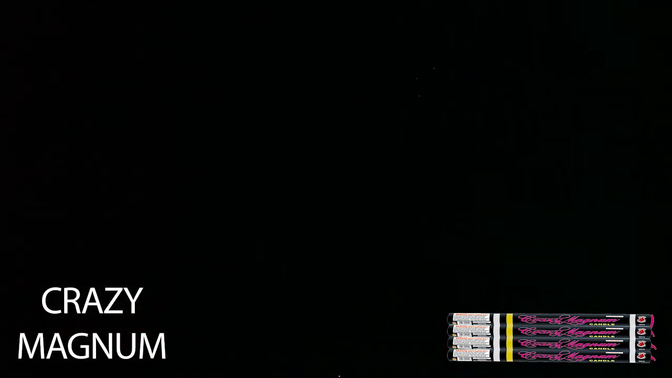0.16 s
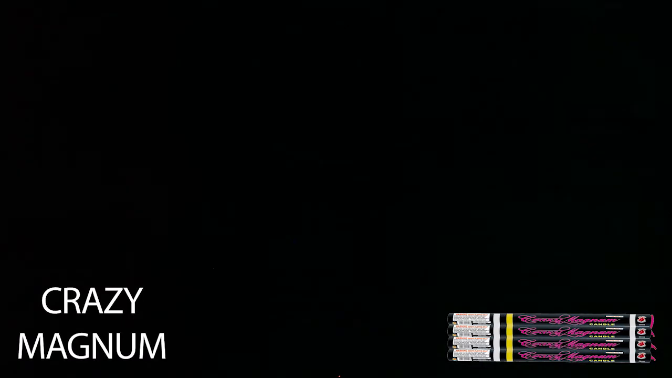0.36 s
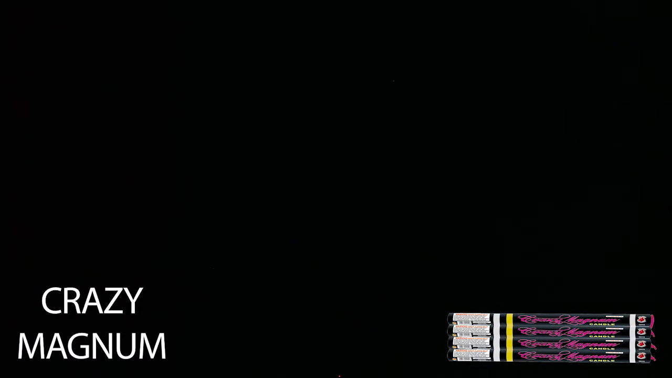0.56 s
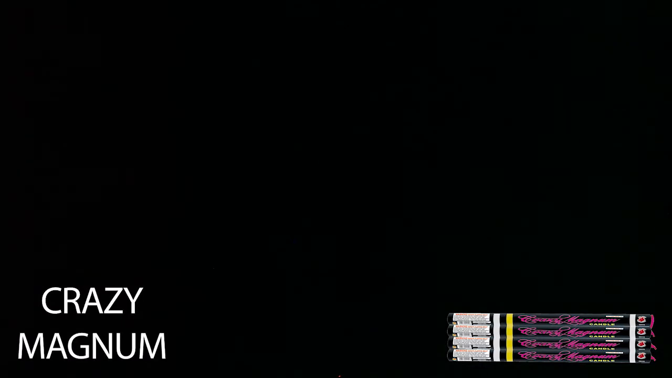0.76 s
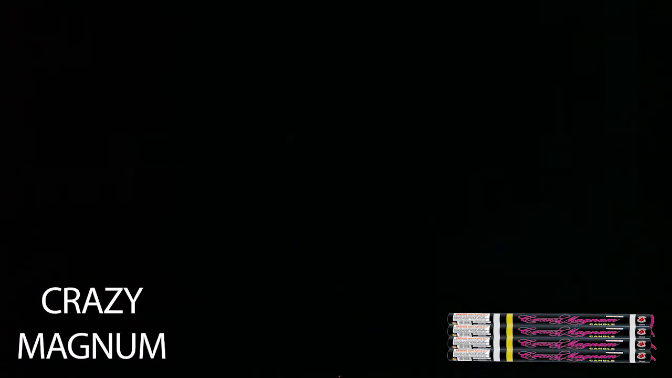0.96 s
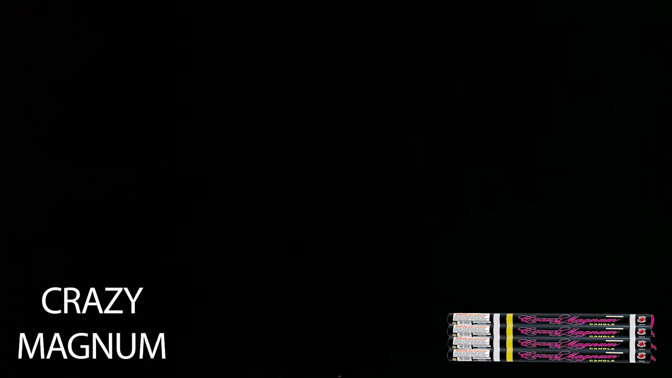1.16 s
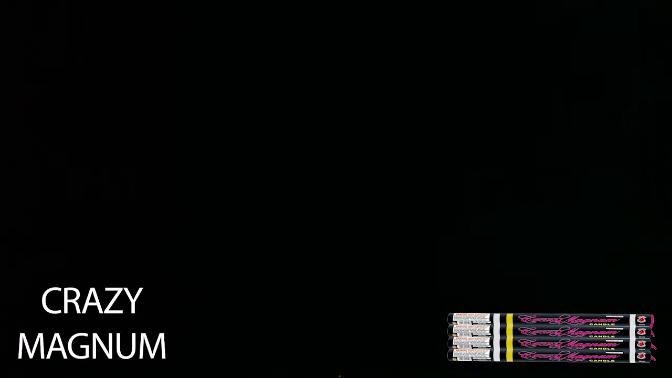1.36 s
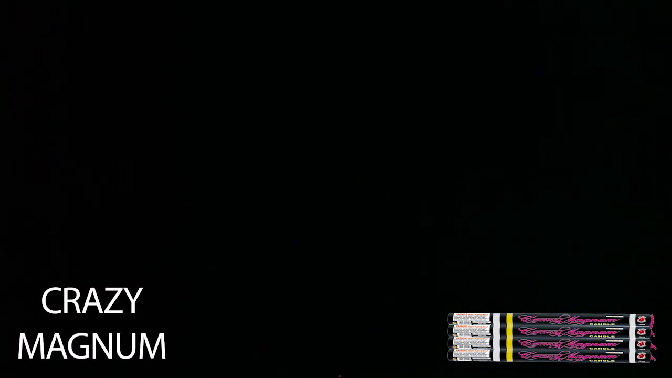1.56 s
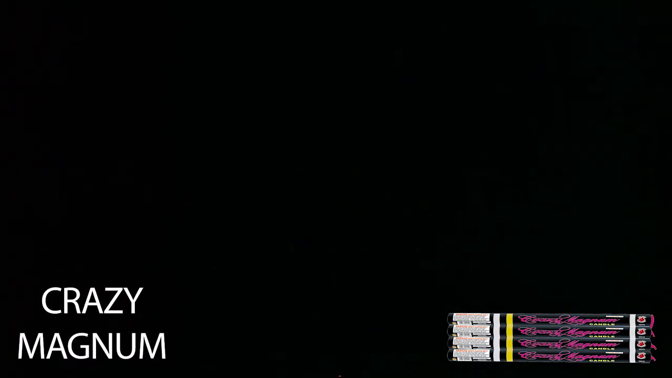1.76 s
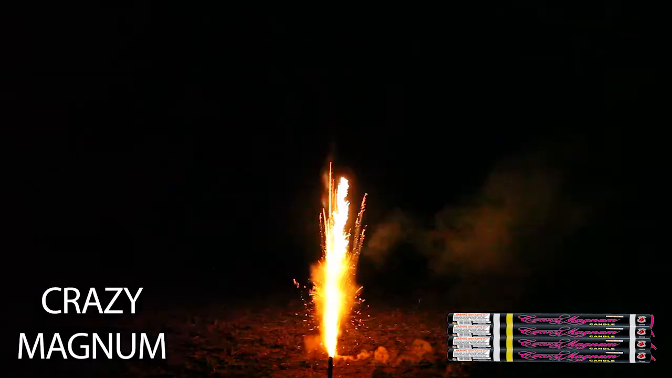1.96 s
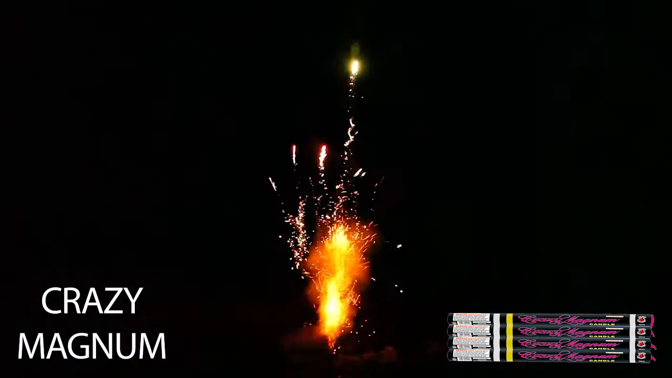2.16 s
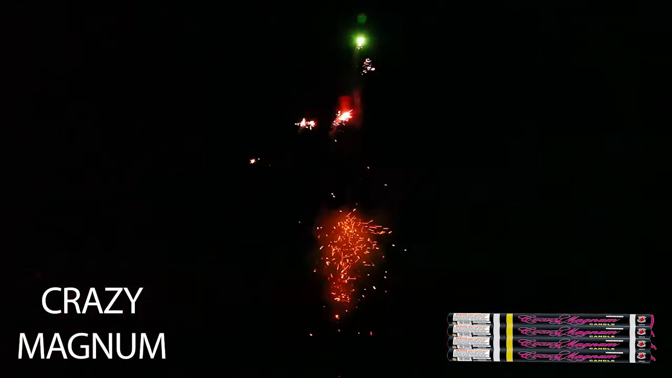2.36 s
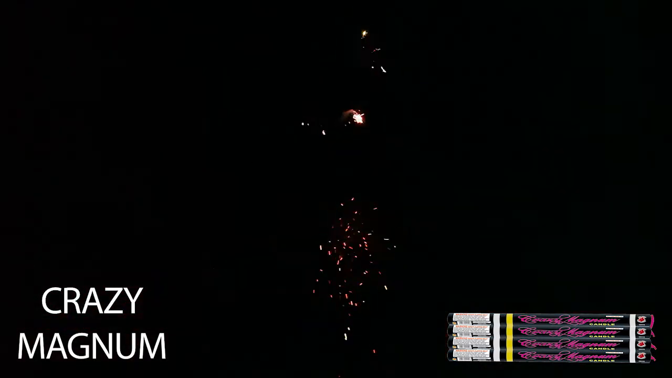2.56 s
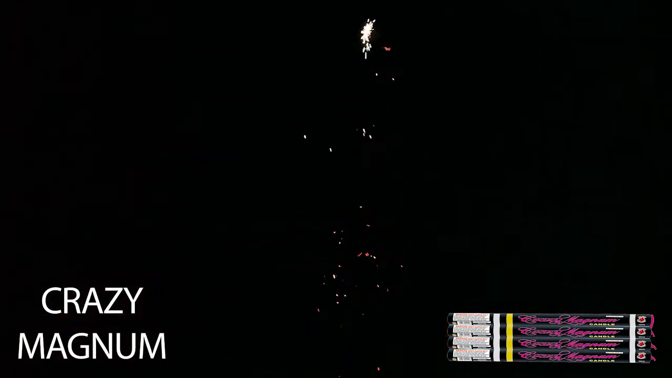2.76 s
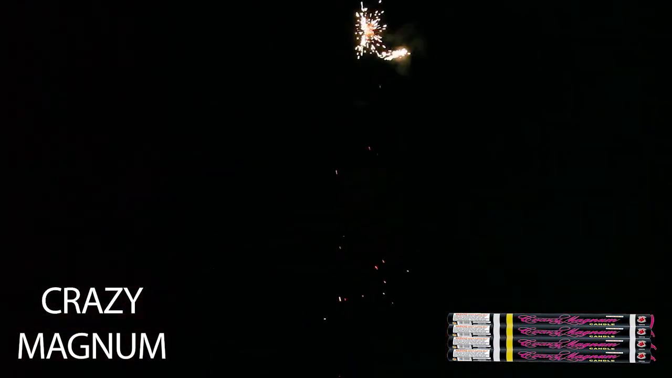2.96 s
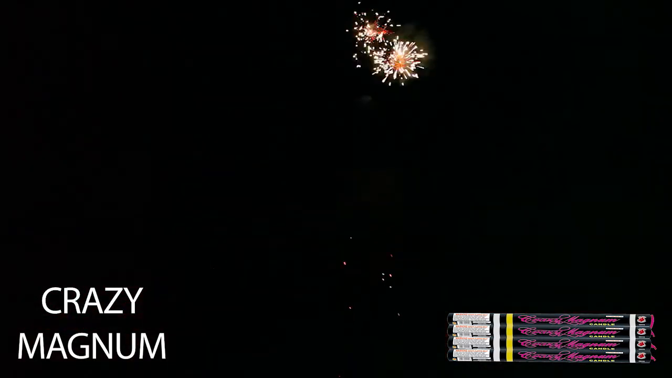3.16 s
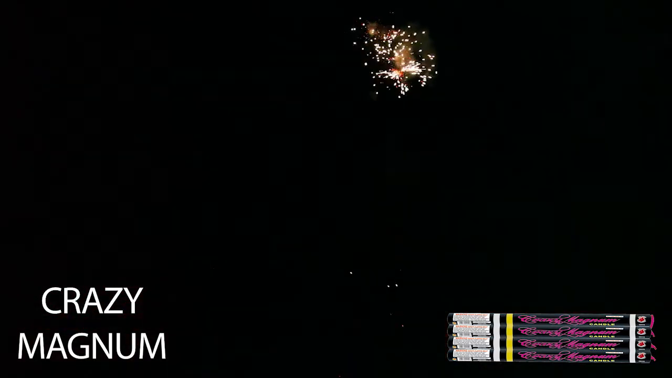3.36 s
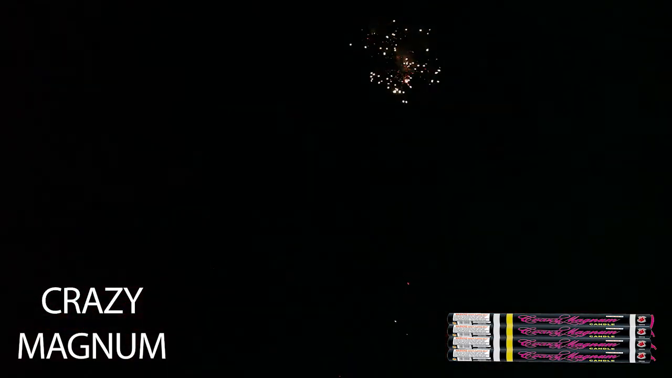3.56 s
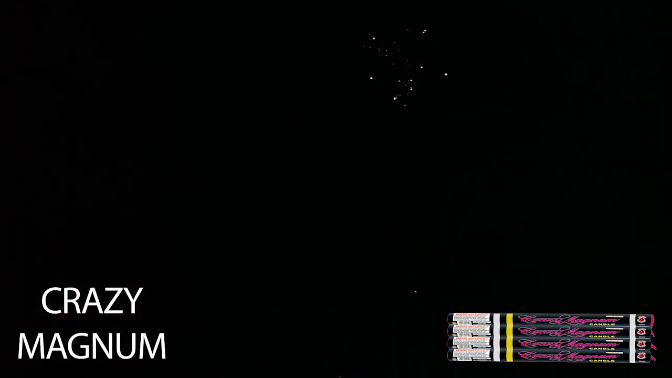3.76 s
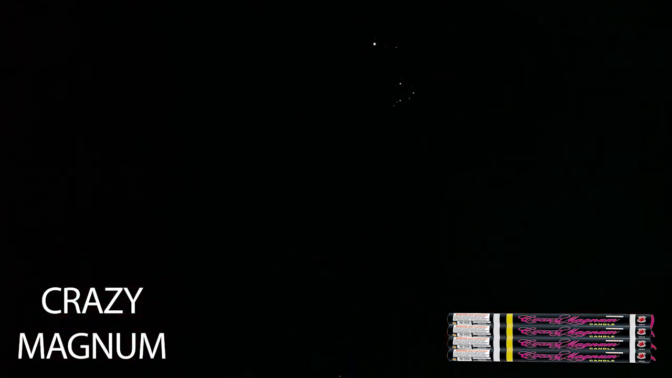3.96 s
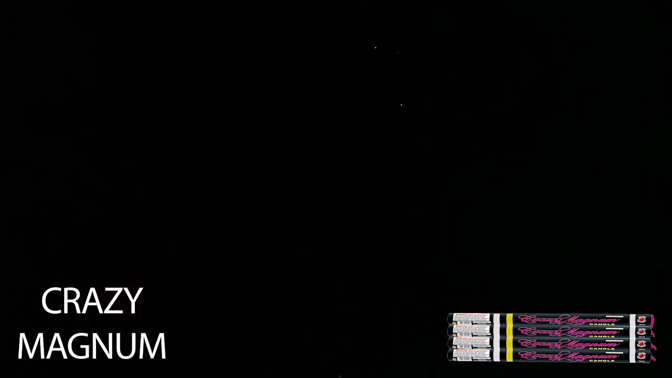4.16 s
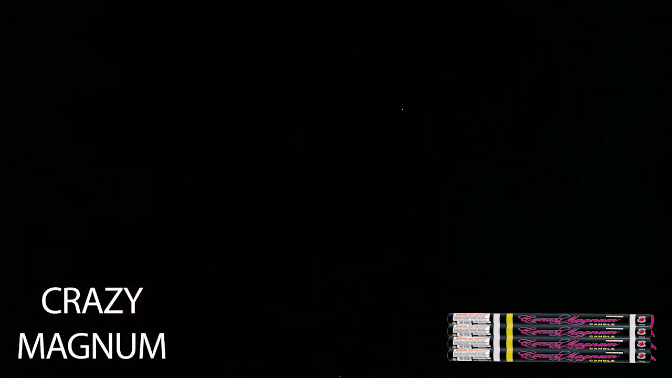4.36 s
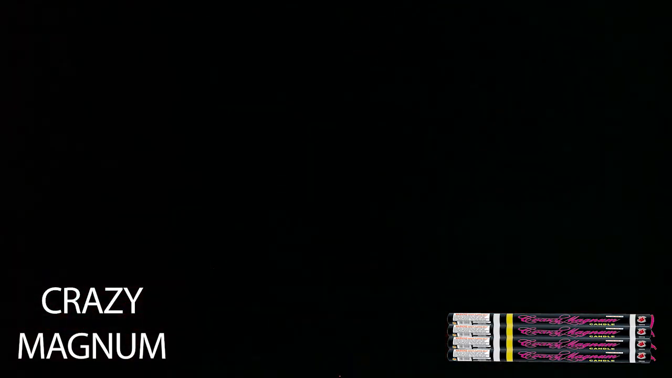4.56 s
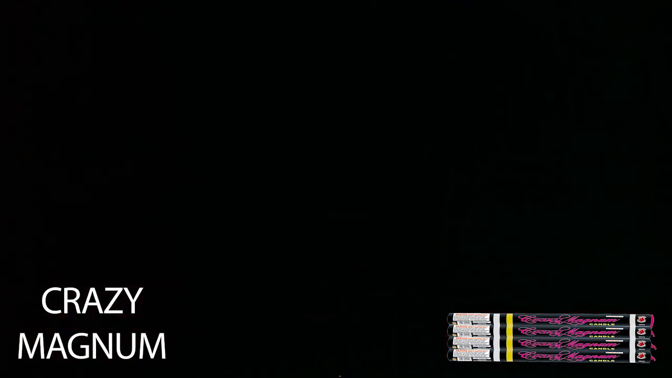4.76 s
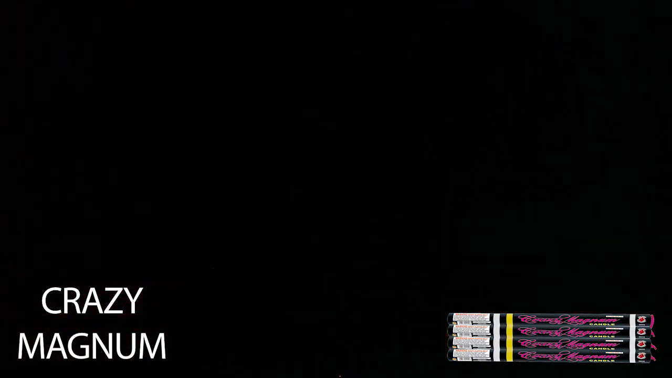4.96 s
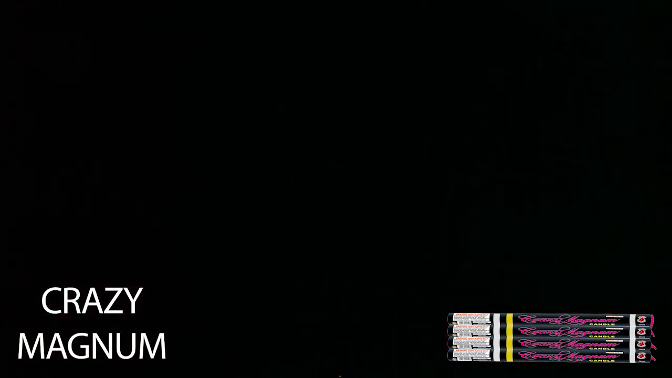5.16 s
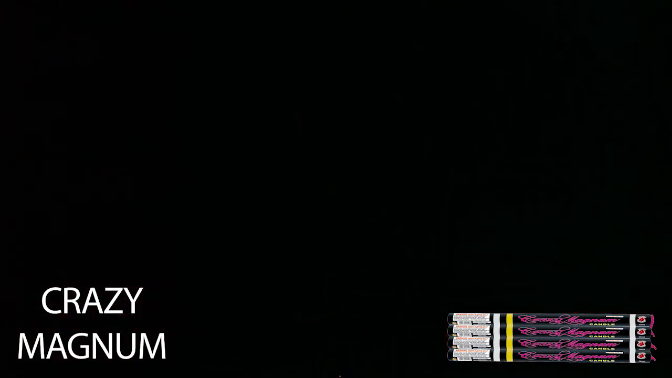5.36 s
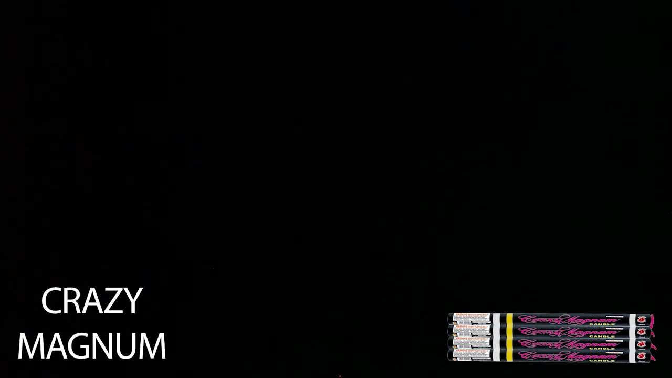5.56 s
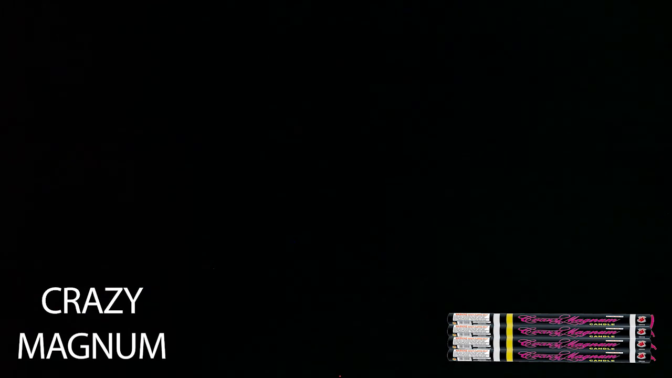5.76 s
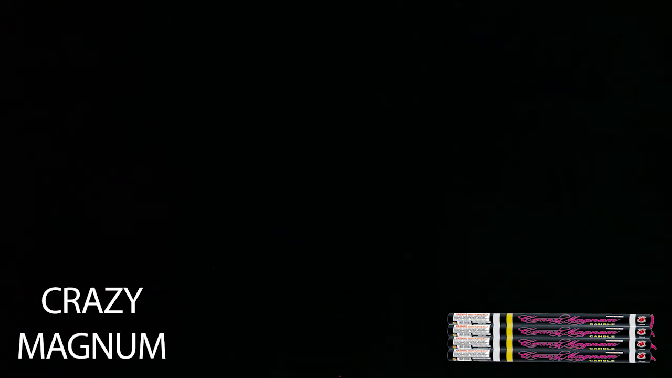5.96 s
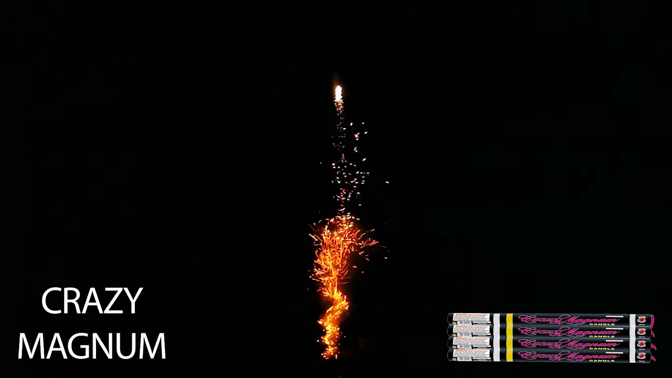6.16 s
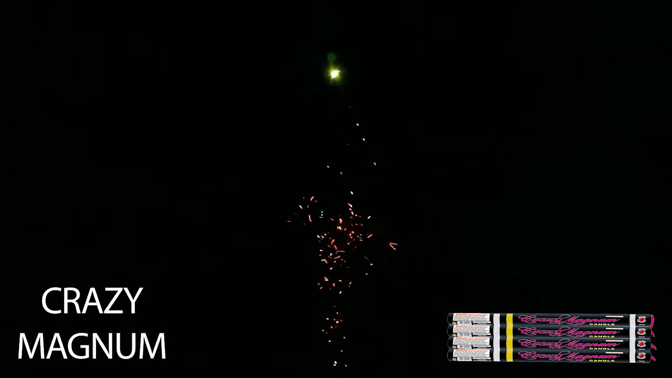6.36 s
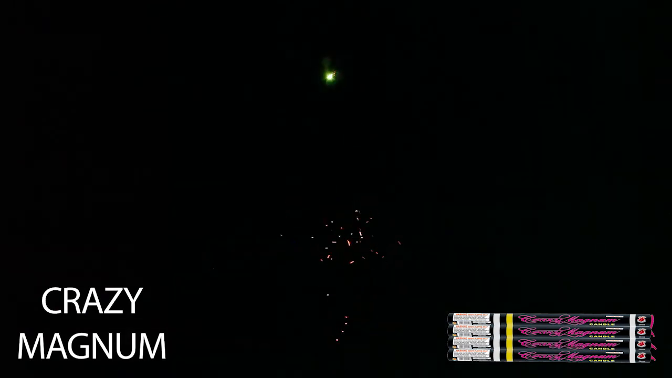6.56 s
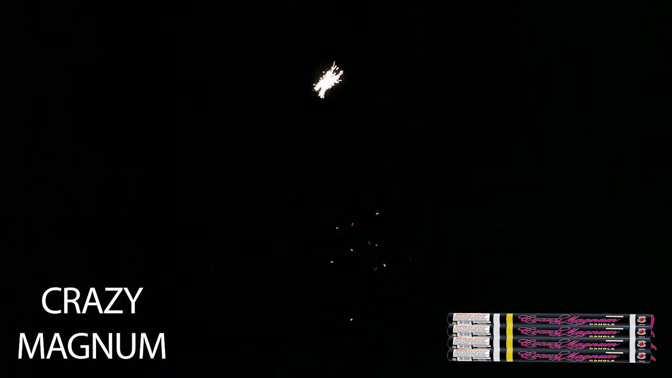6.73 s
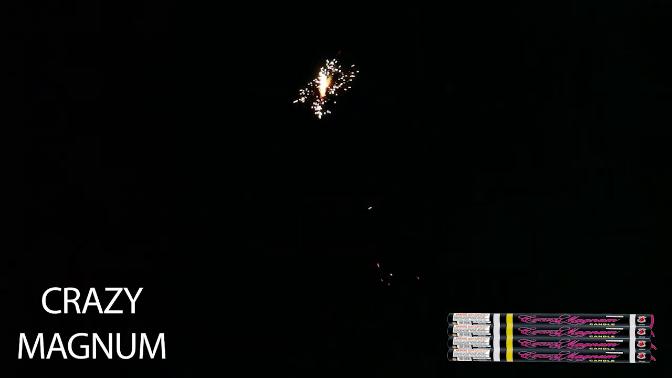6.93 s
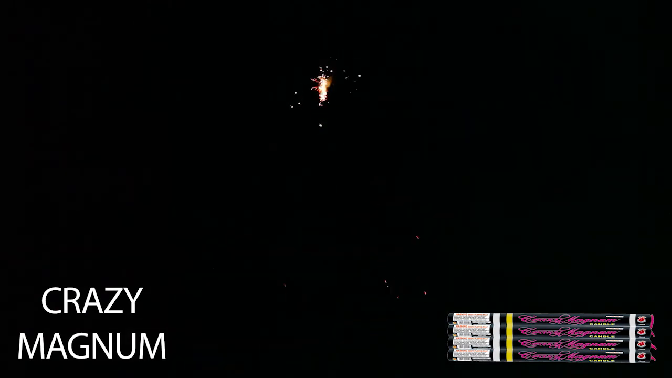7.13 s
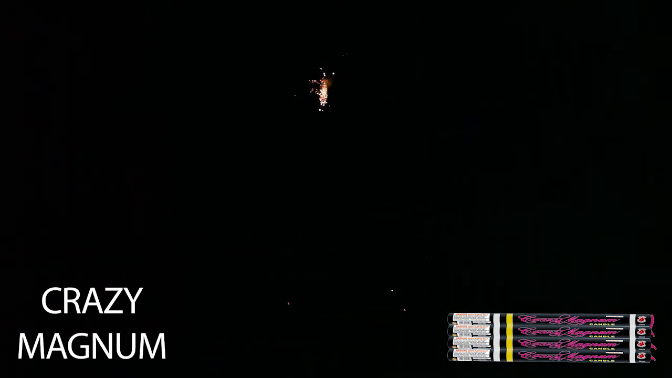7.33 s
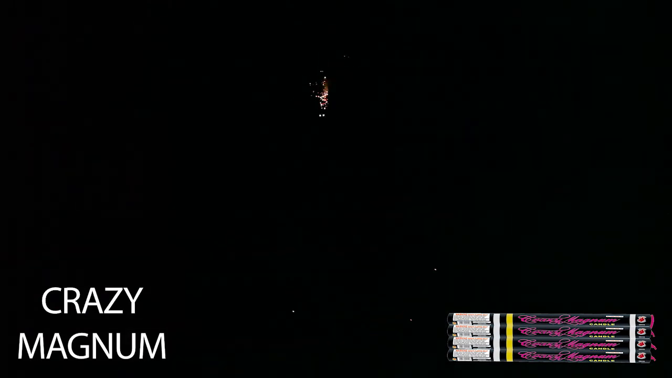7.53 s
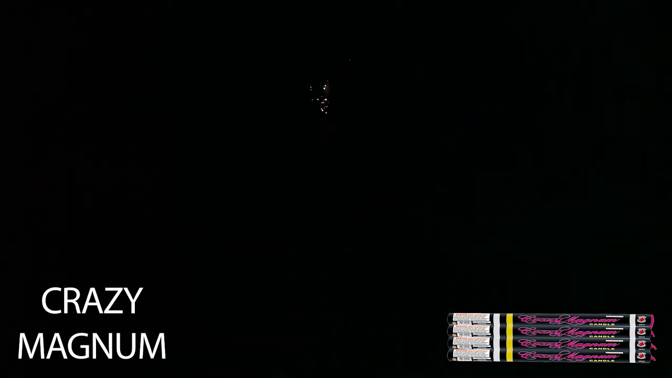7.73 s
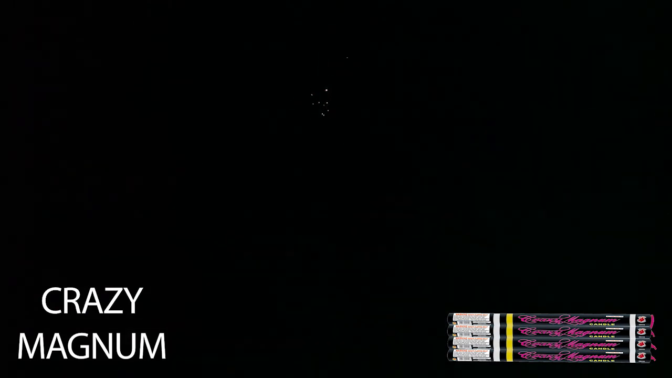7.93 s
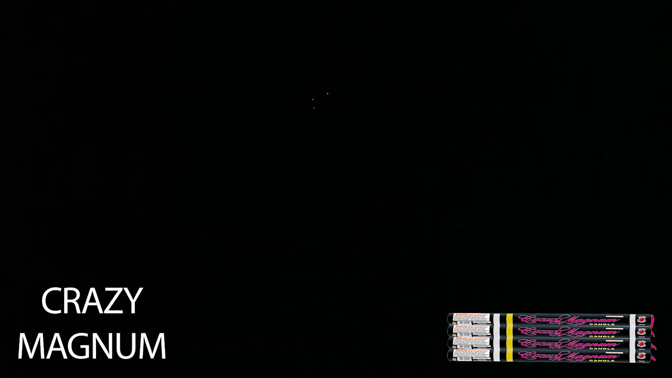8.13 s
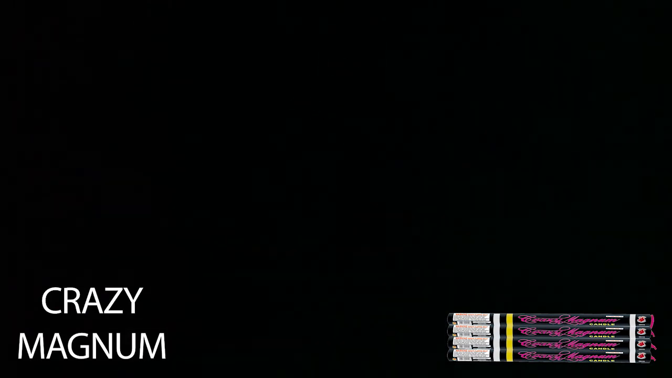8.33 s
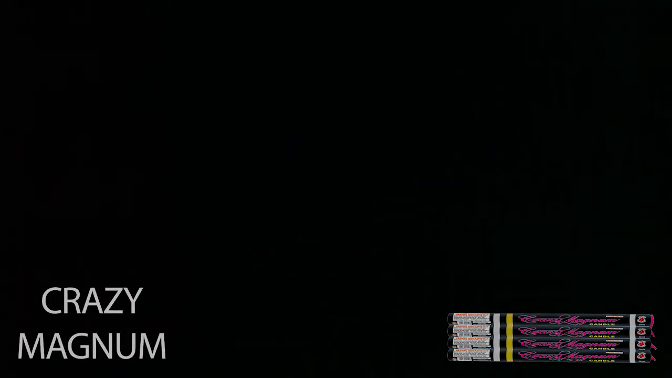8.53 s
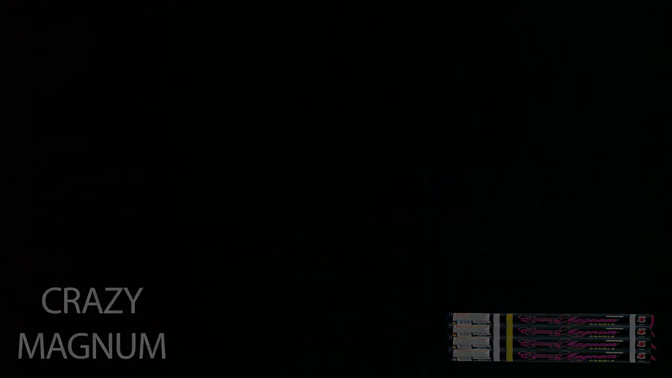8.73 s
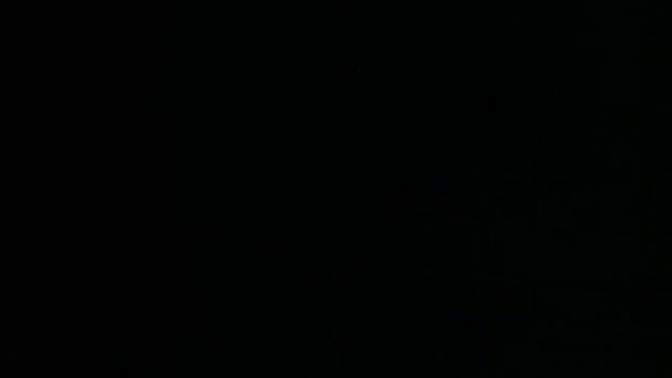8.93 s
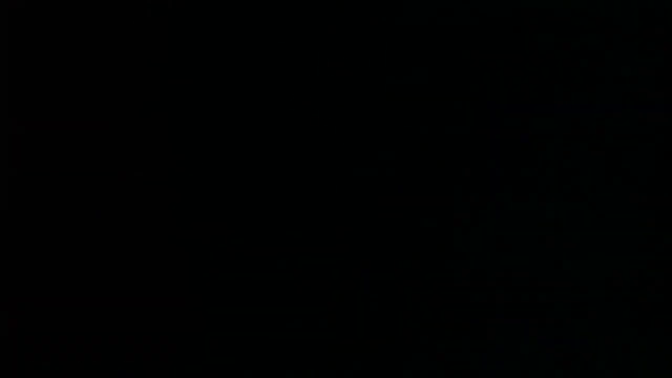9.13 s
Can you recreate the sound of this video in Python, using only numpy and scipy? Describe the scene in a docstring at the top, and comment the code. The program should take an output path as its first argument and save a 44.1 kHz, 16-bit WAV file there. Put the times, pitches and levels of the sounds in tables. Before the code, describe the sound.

At night a fuse hisses and sputters; roman candle shots slam the microphone, sparks crackle overhead, and a whirring star ends in a hard crack.

```python
"""A fuse hisses and snaps at night; then a roman candle fires three shots that overload the microphone.
After each shot the gain control ducks the hiss, then lets it creep back.
The fuse is flickering noise in a cardboard tube; its pitch sinks as the fire burns deeper, down to the bottom.
Aloft, trains of tiny snaps make the stars: the first burst in a long spray of sparks,
the last one spins, swells and ends with a crack. Faint patter follows."""
import sys
import numpy as np
from scipy import signal
from scipy.fft import rfft, irfft
from scipy.io import wavfile
from scipy.ndimage import uniform_filter1d

SR = 44100
rng = np.random.default_rng(int(sys.argv[2]) if len(sys.argv) > 2 else 0)


def transcribe(signal):
    """Save signal, clipped to [-1, 1], as a 16-bit WAV file at the path in sys.argv[1]."""
    frames = np.atleast_2d(signal).T
    limited = np.clip(frames, -1, 1)
    pcm = np.round(limited * 32767).astype(np.int16)
    wavfile.write(sys.argv[1], SR, pcm)


N = 409813
TIME = np.arange(N) / SR  # s
HZ = np.fft.rfftfreq(N, 1 / SR)


def amp(db):
    """Turns decibels into a gain."""
    return 10 ** (np.asarray(db) / 20)


def evened(x):
    """Scales a sound to an rms (average strength) of 1."""
    return x / np.sqrt(np.mean(x ** 2) + 1e-20)


def read(points, hz):
    """Reads a table of (frequency, value) at any frequency, in straight lines on a log-frequency axis."""
    f, value = np.transpose(points)
    return np.interp(np.log(hz + 1), np.log(f + 1), value)


def colour(x, db):
    """Filters x by the gain db at each frequency of HZ, with no sound ahead of its cause (minimum phase)."""
    cepstrum = irfft(np.log(amp(db)), N)
    # folding the second half onto the first makes the filter causal
    cepstrum[1:N // 2] *= 2
    cepstrum[N // 2 + 1:] = 0
    response = np.exp(rfft(cepstrum))
    return irfft(rfft(x) * response, N)


def shaped(x, spectrum):
    """Colours x by a spectrum table, keeping the power of white noise."""
    db = read(spectrum, HZ)
    return colour(x, db) / np.sqrt(np.mean(amp(db) ** 2))


def wander(rate_hz):
    """Random drift of rms 1: noise whose changes faster than about rate_hz are weakened."""
    slowed = rfft(rng.standard_normal(N)) / (1 + (HZ / rate_hz) ** 2)
    return evened(irfft(slowed, N))


def sparks(per_s, spread_db):
    """A random train of tiny snaps of uneven size, rms 1."""
    size = amp(spread_db * np.minimum(rng.exponential(1, N), 4))
    snaps = size * rng.standard_normal(N)
    present = rng.random(N) < per_s / SR
    return evened(snaps * present)


def envelope(start, rise, length, release, fade_db_per_s=0):
    """A smooth rise, a steady fade (growth if negative) while it burns, and a quick dying away after its length."""
    age = np.maximum(TIME - start, 0)
    attack = np.sin(np.pi / 2 * np.minimum(age / rise, 1)) ** 2
    burnt = np.maximum(np.minimum(age, length) - rise, 0)
    dying = np.exp(-np.maximum(age - length, 0) / release)
    return attack * amp(-fade_db_per_s * burnt) * dying


def night(level_db=-52, waver_db=1.2):
    """Distant rumble under a hiss: coloured noise whose level wavers gently."""
    # rumble and hiss: pitch_hz [Hz], level_db [relative dB per Hz]
    night_colour = [(15, -37.5), (25, -11.5), (75, 1), (240, -10.5), (614, -12), (919, -13.5),
                    (1410, -15.5), (2420, -17), (3340, -17), (7500, -18), (15500, -18.5)]
    level = amp(level_db + waver_db * wander(rate_hz=3.6))
    return level * shaped(rng.standard_normal(N), night_colour)


def fuse():
    """Sputtering flame noise in a tube closed at one end: odd multiples of its lowest resonance stand out."""
    # the fire flares up and burns down: start_s [s], rise_s [s], length_s [s], level_db [dB],
    # fade_db_per_s [dB/s], bass_db [dB], treble_db [dB]
    burn_table = [(-.05, .02, 0.13, -49.5, 30, 3, -4), (0.089, .2, 1.7, -53, 19, 4.5, 1),
                  (2.12, 0.084, 0.75, -38, 10, -2, 0), (2.902, 0.6, 1.704, -39, 8, 0.5, 3.5),
                  (4.71, .07, 0.18, -44, 22, -1.5, -0.5), (4.829, .12, 0.47, -51, 0, 1, -4),
                  (5.26, .1, .75, -49, 8, 0, -8.5), (6.102, 0.26, 1.72, -38.5, 19, 2, 0)]
    # colour of the flame: pitch_hz [Hz], level_db [relative dB per Hz]
    flame_colour = [(60, -20), (160, -8.5), (260, -0.5), (550, -11.5), (1150, 0.5), (2300, 1.5), (2900, -7),
                    (3500, -1), (4800, -10), (5600, -18.5), (6800, -12.5), (10000, -29), (16000, -29.5)]
    burn_out_s, dulling_db_per_s = 0.067, 1  # each flare dies away; its treble dulls as it ages
    first_depth_m, burn_m_per_s, bottom_m, sound_m_per_s = .24, .0195, .35, 343
    loss_per_m, loss_hz, flutter_db = 1.55, 7500, 1.1

    power, bass_sum, treble_sum = np.full(N, 1e-14), np.zeros(N), np.zeros(N)
    for start, rise, length, db, fade, bass_db, treble_db in burn_table:
        flare = (amp(db) * envelope(start, rise, length, burn_out_s, fade)) ** 2
        power += flare
        bass_sum += flare * bass_db
        treble_sum += flare * (treble_db - dulling_db_per_s * (TIME - start))

    hz, t, z = signal.stft(sparks(per_s=22000, spread_db=3), SR, nperseg=1024, noverlap=768)
    hz = hz[:, None]
    # sound runs down the tube and back; it returns weaker, most of all in the treble
    depth_m = np.minimum(first_depth_m + burn_m_per_s * t, bottom_m)
    delay_s = 2 * depth_m / sound_m_per_s
    round_trip = np.exp(-loss_per_m * depth_m - hz / loss_hz) * np.exp(-2j * np.pi * hz * delay_s)
    # where flares overlap, the stronger one decides the tone
    treble = read([(2400, 0.08), (3000, 0.82)], hz) * np.interp(t, TIME, treble_sum / power)
    bass = read([(1150, 0.95), (1700, 0)], hz) * np.interp(t, TIME, bass_sum / power)
    gain = amp(read(flame_colour, hz) + bass + treble) / abs(1 + round_trip)
    hiss = signal.istft(z * gain, SR, nperseg=1024, noverlap=768)[1][:N]
    return evened(hiss) * np.sqrt(power) * amp(flutter_db * wander(rate_hz=31))


def cracks(size=2048):
    """Single snaps of stars and embers, each a click in one broad band."""
    # snaps: start_s [s], peak_db [dB], centre_hz [Hz], width [octaves]
    crack_table = [(.048, -23.5, 1140, 1.3), (0.081, -35, 900, 0.71), (1.122, -33, 1680, 0.76),
                   (3.055, -2.5, 2420, 0.54), (3.554, -21, 2540, 0.84), (6.9309, 6, 1110, 1.7),
                   (7.092, -19, 1515, 1.3), (7.270, -27, 1200, 1.14), (7.416, -28, 1300, 1),
                   (7.861, -41, 700, 0.4), (7.959, -41, 705, 0.31), (7.984, -38.5, 2680, 0.51),
                   (8.007, -41.5, 900, .7), (8.037, -44, 1000, 0.37), (8.672, -43, 795, 0.37)]
    out, hz = np.zeros(N), np.fft.rfftfreq(size, 1 / SR)
    for s, db, centre_hz, octaves in crack_table:
        distance = np.log2((hz + 1) / centre_hz) / octaves
        log_gain = -np.log1p(distance ** 6) / 2
        # the phase that goes with this gain puts the energy at the start of the click
        circle = np.concatenate([log_gain, log_gain[-2:0:-1]])
        click = np.fft.ifft(np.exp(np.conj(signal.hilbert(circle)))).real[:size // 2]
        out[round(s * SR):][:size // 2] += amp(db) * click / abs(click).max()
    return out


def shots(jet_decay=0.0029, linger_db=-27, linger=0.021, boom_decay=0.0076, low_hz=60):
    """Each blast: a gas jet swells and collapses, a pressure wave leaves the muzzle, the air in the tube booms."""
    # blasts: time_s [s], jet_db [dB], swell_s [s], wave_db [dB], wave_length_s [s], boom_db [dB], boom_hz [Hz]
    blast_table = [(1.93, -6.5, 0.0026, -7.5, .001, -12, 258),
                   (1.9353, -2.5, 0.00038, -9.5, 0.0013, -17, 370), (1.94, 1, .002, -7, .0013, -10.5, 155),
                   (2.092, -26, 0.017, -39.5, .001, -33.5, 289), (2.0937, 9, 0.0024, 7, .0014, -2.5, 250),
                   (6.0222, -10, 0.0053, -4.5, 0.0013, -10.5, 358),
                   (6.03, 2.5, 0.0033, 5.5, .0022, -7, 158.4)]
    # colour of the gas jet: pitch_hz [Hz], level_db [relative dB per Hz]
    jet_colour = [(60, -13), (200, 1.5), (380, -0.5), (560, -9.5), (1000, -1.5), (1400, -0.5), (2300, -1.5),
                  (4300, -7.5), (5500, -15.5), (9000, -22.5), (16000, -30)]
    # a star chirps as it leaves the tube: start_s [s], level_db [dB], length_s [s], first_hz [Hz], last_hz [Hz]
    chirp_table = [(2.089, 1, 0.0063, 977, 1690), (6.023, -4.5, 0.0033, 1196, 2189)]

    jet_power, wave = np.zeros(N), np.zeros(N)
    for s, jet_db, swell, wave_db, length, boom_db, boom_hz in blast_table:
        span = slice(round(s * SR) - SR // 10, round(s * SR) + SR // 2)
        before, after = np.maximum(s - TIME[span], 0), np.maximum(TIME[span] - s, 0)
        fall = np.exp(-after / jet_decay) + amp(linger_db) * np.exp(-after / linger)
        jet_power[span] += (amp(jet_db) * np.exp(-before / swell) * fall) ** 2
        wave[span] -= amp(wave_db) * (after > 0) * (1 - after / length) * np.exp(-after / length)
        wave[span] -= amp(boom_db) * np.sin(2 * np.pi * boom_hz * after) * np.exp(-after / boom_decay)

    for s, db, length, first_hz, last_hz in chirp_table:
        progress = np.clip((TIME - s) / length, 0, 1)
        turns = length * progress * (first_hz + (last_hz - first_hz) * progress / 2)
        wave += amp(db) * np.sin(2 * np.pi * turns) * (progress < 1)

    high_pass = signal.butter(2, low_hz, "high", fs=SR, output="sos")
    wave = signal.sosfilt(high_pass, wave)
    jet = shaped(np.sqrt(jet_power) * rng.standard_normal(N), jet_colour)
    return jet + wave


def field(x, near_db, far_db, far_t60, echo_db, echo_s):
    """Open ground answers a sound: one early echo, a quick scatter and a faint far roll."""
    # colour of the scatter: pitch_hz [Hz], level_db [relative dB]
    scatter_colour = [(50, -5.5), (150, 7), (300, -0.5), (500, -1), (900, -6.5), (2200, -12.5),
                      (5000, -9.5), (14000, -11.5)]
    # how long the scatter takes to die by 60 dB: pitch_hz [Hz], decay_s [s]
    scatter_t60 = [(100, 0.082), (450, .3), (1000, 0.22), (3000, 0.45), (12000, 0.29)]
    hz, t, z = signal.stft(rng.standard_normal(SR), SR, nperseg=256)
    decay = amp(read(scatter_colour, hz)[:, None] - 60 * t / read(scatter_t60, hz)[:, None])
    near = signal.istft(z * decay, SR, nperseg=256)[1][:SR]
    low_pass = signal.butter(2, 4000, fs=SR, output="sos")
    far = signal.sosfilt(low_pass, rng.standard_normal(SR)) * amp(-60 * TIME[:SR] / far_t60)
    response = amp(near_db) * near / np.linalg.norm(near) + amp(far_db) * far / np.linalg.norm(far)
    response[round(echo_s * SR)] += amp(echo_db)
    return x + signal.fftconvolve(x, response)[:N]


def climbs(rise=0.12):
    """The rising stars catch fire; their shower of sparks swells and fades."""
    # sparks after a launch: start_s [s], level_db [dB], decay_s [s]
    climb_table = [(2.1, -19, 0.18), (6.059, -27.5, .4)]
    # colour of the sparks: pitch_hz [Hz], level_db [relative dB per Hz]
    trail_colour = [(60, -12), (200, 2), (520, -3.5), (650, -1), (780, 7.5), (960, -3), (1300, 0),
                    (2200, -5), (3000, -6.5), (4700, -7), (5600, -17.5), (8000, -19), (15000, -31)]
    level = np.zeros(N)
    for s, db, decay in climb_table:
        age = np.maximum(TIME - s, 0)
        level += amp(db) * (1 - np.exp(-age / rise)) ** 2 * np.exp(-age / decay)
    return shaped(level * sparks(per_s=5100, spread_db=1.0), trail_colour)


def spray(flutter_db=1.6):
    """Thousands of sparks rush together, swell, fade and stop; single stars stand out."""
    # single stars flare up: start_s [s], level_db [dB]
    flare_table = [(2.778, -25), (2.879, -26.5), (3.115, -31), (3.276, -13.5), (3.352, -20), (3.424, -25.5)]
    # colour of the spray: pitch_hz [Hz], level_db [relative dB per Hz]
    spray_colour = [(70, -37), (173, -19.5), (290, -2), (530, -6.5), (720, 0), (900, -3), (3460, -1),
                    (4820, -3), (5600, -15), (6400, -11), (8500, -16.5), (9800, -22.5), (13500, -22),
                    (15800, -32.5)]
    start_s, rise_s, length_s, out_s = 2.745, .43, 0.68, 0.022
    level_db, fade_db_per_s = -19, 20
    flare_rise_s, flare_decay_s = 0.015, 0.021

    power = (amp(level_db) * envelope(start_s, rise_s, length_s, out_s, fade_db_per_s)) ** 2
    for s, db in flare_table:
        power += (amp(db) * envelope(s, flare_rise_s, flare_rise_s, flare_decay_s)) ** 2
    level = np.sqrt(power) * amp(flutter_db * wander(rate_hz=88))
    return shaped(level * sparks(per_s=6500, spread_db=-0.26), spray_colour)


def spinner(main_db=3, twin_db=1.5, flutter_db=2.5):
    """A burning star tumbles and grows louder; a strong and a weak jet sweep past in each turn."""
    # colour of the star: pitch_hz [Hz], level_db [relative dB per Hz]
    spin_colour = [(47, -57.5), (80, -38.5), (294, -17), (418, -6.5), (581, -16.5), (809, -4.5),
                   (1010, -9.5), (1600, -5), (2000, -5.5), (3780, -1.5), (4930, -2), (5620, -12),
                   (6860, -9), (13300, -30.5), (15500, -34.5)]
    start_s, rise_s, length_s, out_s = 6.738, 0.0088, .194, 0.0022  # cut off as it bursts
    level_db, growth_db_per_s = -23.5, 99
    # the strong jet first faces the listener at facing_s; from whirl_s on the star turns faster
    facing_s, spin_hz, whirl_s, whirl_hz = 6.748, 38.8, 6.904, 55

    turns = spin_hz * (TIME - facing_s) + (whirl_hz - spin_hz) * np.maximum(TIME - whirl_s, 0)
    angle = 2 * np.pi * turns
    throb_db = main_db * np.cos(angle) + twin_db * np.cos(2 * angle) + flutter_db * wander(rate_hz=64)
    level = amp(level_db + throb_db) * envelope(start_s, rise_s, length_s, out_s, -growth_db_per_s)
    return shaped(level * sparks(per_s=10000, spread_db=0.0), spin_colour)


def patter(half_length_s=0.15):
    """Flurries of faint, dull, scattered taps, as of burnt bits landing on the ground."""
    # flurries: middle_s [s], level_db [dB]
    flurry_table = [(8.019, -62.5), (8.581, -63)]
    # colour of a landing bit: pitch_hz [Hz], level_db [relative dB per Hz]
    thud_colour = [(150, -24), (450, 0), (750, 4.5), (1200, -5), (3000, -33), (10000, -40)]
    level = np.zeros(N)
    for s, db in flurry_table:
        level += amp(db) * np.exp(-((TIME - s) / half_length_s) ** 2 / 2)
    return shaped(level * sparks(per_s=140, spread_db=2.5), thud_colour)


def scene():
    """The tube on the ground, the stars in the air, the night around them."""
    ground = field(shots(), near_db=-23.5, far_db=-41.5, far_t60=0.93, echo_db=-24, echo_s=0.018)
    stars = spray() + spinner() + cracks()
    air = field(stars, near_db=-20.5, far_db=-36, far_t60=1.0, echo_db=-17.0, echo_s=.014)
    return (ground + air + fuse() + climbs() + patter() + night())[None]


def overload(x, knee=8):
    """Flattens peaks at full scale; a higher knee bends more sharply."""
    return x / (1 + abs(x) ** knee) ** (1 / knee)


def eased(x, seconds):
    """Follows x smoothly, arriving after the given time."""
    window = np.hanning(round(seconds * SR))
    return x[0] + signal.fftconvolve(x - x[0], window / window.sum())[:N]


def record(dry, depth_db=24.5, recovery=1.0, start_db=8):
    """Bangs overload the input; a bass thump makes output and input gain sink, then both creep back."""
    thump_db, step_db, step_s, sink_s = -16.5, 5.5, .06, .4  # quick output step, slower input sink
    fade_end_s, fade_s, edge_hz = 9.48, 0.99, 15800  # the sound ends before the fade is complete

    bass_filter = signal.butter(3, 350, fs=SR, output="sos")
    bass = signal.sosfilt(bass_filter, overload(dry[0]))
    bass_db = 10 * np.log10(abs(uniform_filter1d(bass ** 2, size=512)) + 1e-12)
    last_thump = np.maximum.accumulate(np.where(bass_db > thump_db, TIME, -np.inf))
    memory = np.exp((last_thump - TIME) / recovery)  # 1 at a thump, then fading

    # the input gain also starts out lowered and recovers
    sink_db = depth_db * eased(memory, sink_s) + start_db * np.exp(-TIME / recovery)
    x = overload(dry[0] * amp(-sink_db)) * amp(-step_db * eased(memory, step_s))
    high_pass = signal.butter(1, 25, "high", fs=SR, output="sos")
    out = signal.sosfilt(high_pass, x) * np.clip((fade_end_s - TIME) / fade_s, 0, 1)
    # steep treble limit
    low_pass = signal.firwin(511, edge_hz, window=("kaiser", 9), fs=SR)
    return signal.oaconvolve(out, low_pass, "same")[None]


dry = scene()
out = record(dry)
transcribe(out)
```